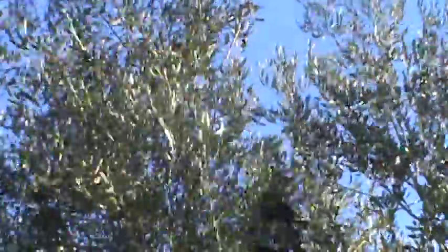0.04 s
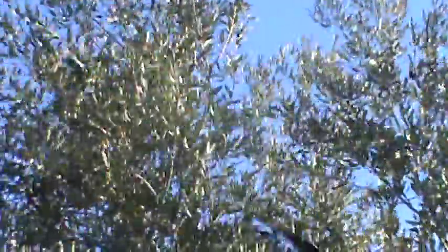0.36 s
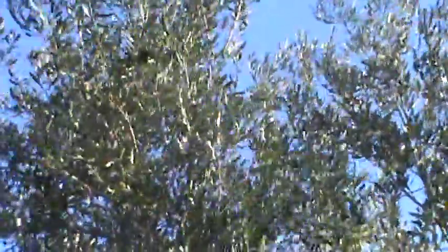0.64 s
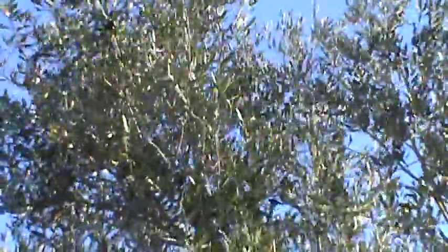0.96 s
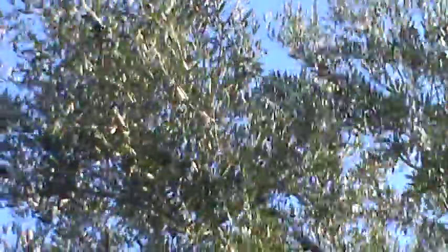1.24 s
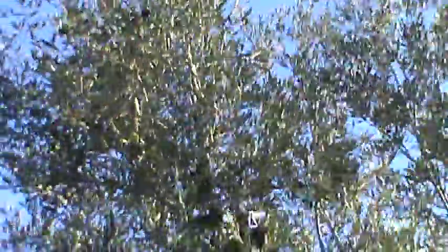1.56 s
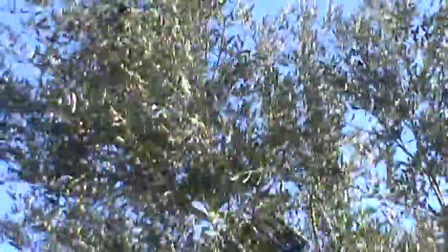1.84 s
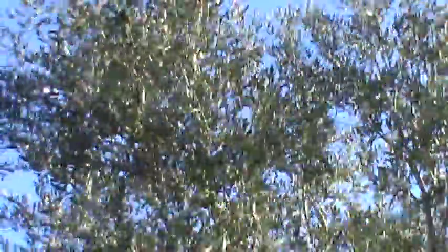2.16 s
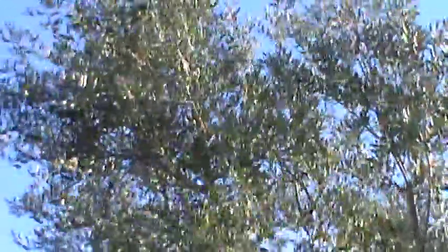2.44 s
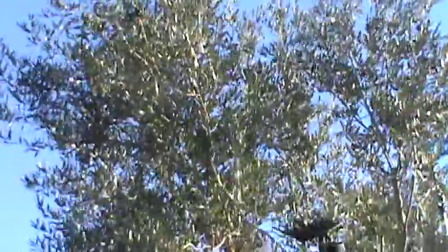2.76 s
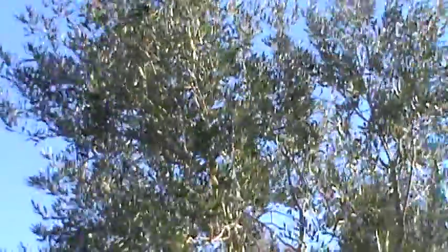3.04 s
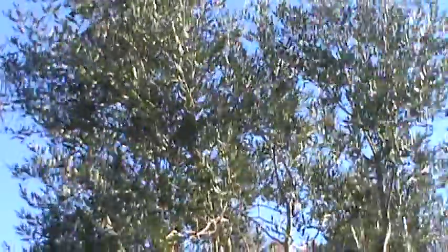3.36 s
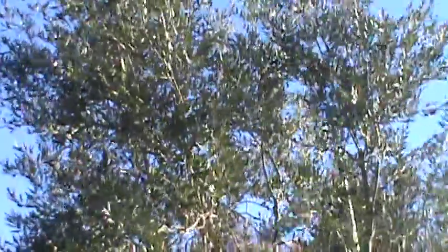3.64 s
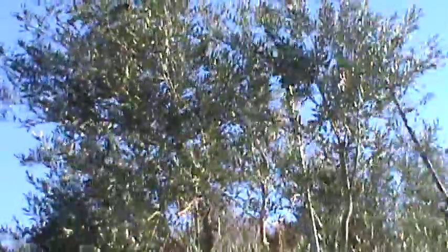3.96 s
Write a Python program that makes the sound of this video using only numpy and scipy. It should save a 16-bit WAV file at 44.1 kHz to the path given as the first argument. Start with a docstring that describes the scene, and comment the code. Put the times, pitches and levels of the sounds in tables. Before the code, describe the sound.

Air-driven rakes clatter rapidly in an olive tree for the whole four seconds, with thrashing twigs, rustling leaves, pinging tines and a bright air hiss. Engines thud further off, one chirping with each turn. From about 0.4 seconds, scattered hard blows hit branches; from 0.5 seconds the hiss tightens now and then into brief, high, fuzzy whistles. Four clear clinks stand out between 1 and 2.1 seconds.

```python
"""Air-driven rakes shake an olive tree outdoors. From the start, twigs thrash under a bright hiss of air,
boughs rustle, leaves sizzle and struck tines ring. Three engines thud further off, the nearest with a
chirp each turn; the combs clack twice per stroke. From 0.37 s hard blows land on branches, from 0.5 s
the hiss tightens into short fuzzy whistles, and between 1 and 2.1 s four clear clinks stand out.
Throughout, a fast gain control leans on the loudest moments."""
import sys
import numpy as np
from scipy import signal
from scipy.fft import rfft, irfft
from scipy.io import wavfile
from scipy.ndimage import uniform_filter1d

SR = 44100
rng = np.random.default_rng(int(sys.argv[2]) if len(sys.argv) > 2 else 0)


def dump(signal):
    """Clip the signal to [-1, 1] and save it as 16-bit WAV at the path in sys.argv[1]."""
    limited = np.clip(np.atleast_2d(signal).T, -1, 1)
    pcm = np.round(limited * 32767).astype(np.int16)
    wavfile.write(sys.argv[1], SR, pcm)


N = 176400
TIME = np.arange(N) / SR


def amp(db):
    """dB to gain."""
    return 10 ** (np.asarray(db) / 20)


def unit(x):
    """Scale to rms 1."""
    return x / np.sqrt(np.mean(x ** 2) + 1e-20)


def curve(table, column=1):
    """Time table column, interpolated per sample."""
    table = np.array(table)
    return np.interp(TIME, table[:, 0], table[:, column])


def at_hz(table, hz):
    """Frequency table, interpolated over log f."""
    f, value = np.transpose(table)
    return np.interp(np.log(hz + 1), np.log(f + 1), value)


def add(mix, start_s, sound):
    """Mix in place at start_s."""
    part = mix[max(round(start_s * SR), 0):][:len(sound)]
    part += sound[:len(part)]


def drift(cutoff_hz):
    """Low-passed noise, rms 1."""
    rolloff = 1 + (np.fft.rfftfreq(N, 1 / SR) / cutoff_hz) ** 4
    return unit(irfft(rfft(rng.standard_normal(N)) / rolloff, N))


def colour(x, spectrum, size=4096):
    """Minimum-phase filter of unit energy: spectrum levels are relative."""
    log_gain = np.log(amp(at_hz(spectrum, abs(np.fft.fftfreq(size, 1 / SR)))))
    response = np.exp(np.conj(signal.hilbert(log_gain)))
    taps = np.fft.ifft(response).real[:size // 2]
    return signal.oaconvolve(x, taps / np.linalg.norm(taps))[:N]


def resonate(x, hz, width_hz):
    """Resonator; hz may be a curve."""
    carrier = np.exp(2j * np.pi * np.cumsum(hz * np.ones(len(x))) / SR)
    pole = np.exp(-np.pi * width_hz / SR)
    return 2 * (carrier * signal.lfilter([1 - pole], [1, -pole], x / carrier)).real


def crossings_s(cycles):
    """Times at which a cycle count passes an integer."""
    return TIME[1:][np.diff(np.floor(cycles)) > 0]


# Left-right likeness: f/Hz, coherence
COHERENCE = [(250, 0.93), (550, 0.72), (1200, 0.63), (2500, 0.87), (5000, 0.71), (9000, 0.79),
             (14000, 0.91)]

def stereo(mid, side):
    """Mid/side to left/right, weighted by coherence."""
    coherence = np.clip(at_hz(COHERENCE, np.fft.rfftfreq(N, 1 / SR)), 0, 1)
    mid = irfft(rfft(mid) * np.sqrt((1 + coherence) / 2), N)
    side = irfft(rfft(side) * np.sqrt((1 - coherence) / 2), N)
    return np.array([mid + side, mid - side])


def shaped_noise(spectrum):
    """Stereo noise of a given spectrum."""
    return stereo(*(colour(noise, spectrum) for noise in rng.standard_normal((2, N))))


def band_noise(hz, width_hz):
    """Stereo noise through two resonators in series."""
    bands = [resonate(noise, hz, width_hz) for noise in rng.standard_normal((2, N))]
    return stereo(*(resonate(band, hz, width_hz) for band in bands))


def grove(x, echo_db=0.5, t60_s=0.035, count=6):
    """Stereo scatter from trunks, foliage and ground, shifting as the boughs swing."""
    t = TIME[:SR // 5]
    tails = rng.standard_normal((2, count, len(t))) * amp(-60 * t / t60_s) * (t > .002)
    shares = np.array([drift(7.2) for _ in range(count)])
    paths = x * shares / np.linalg.norm(shares, axis=0)
    mid, side = (signal.oaconvolve(paths, tail / np.linalg.norm(tail), axes=1).sum(0)[:N]
                 for tail in tails)
    return stereo(x + amp(echo_db) * mid, side)


# Struck twigs: f/Hz, level/dB
TWIG_SPECTRUM = [(60, -15.5), (250, -10), (500, -4.5), (750, -8), (1350, -4.5), (2100, 1.5), (2900, 1.5),
                 (3700, 0), (4400, -4), (6500, -3.5), (9000, -5), (16000, -42)]
# Shaken foliage: f/Hz, level/dB
WASH_SPECTRUM = [(20, -41), (45, -14), (110, -2), (250, -1.5), (550, -11), (800, -14.5), (1600, -6.5),
                 (2800, 2.5), (5000, -5.5), (9000, -6), (16000, -26)]
# Raking effort: t/s, thrash gain/dB, hiss level/dB
EFFORT = [(0, 1, -18), (.35, 1, -19), (.5, 2, -19), (.7, 1.5, -20), (.95, -1, -19.5), (1.2, -1, -18),
          (1.5, -2, -19), (1.72, 0, -18.5), (2.05, 0, -17.5), (2.3, 0.5, -19), (2.65, 0.5, -19),
          (3.1, 1.5, -18.5), (3.22, -0.5, -18), (3.3, 2, -19.5), (3.6, 2, -19.5), (3.68, 0, -19.5),
          (4, 2.5, -18)]

def twigs(taps_per_s=900, size_db=3, clump_db=2, tap_db=-30.5, wash_db=-31):
    """Twigs, leaves and olives tap the tines in clumps, over a wash of shaken foliage."""
    def taps():
        hits = (rng.random(N) < taps_per_s / SR) * rng.choice([-1, 1], N)
        sizes = amp(size_db * np.minimum(rng.exponential(1, N), 3))
        return unit(colour(hits * sizes, TWIG_SPECTRUM))
    wash = amp(wash_db) * shaped_noise(WASH_SPECTRUM)
    clumps = amp(tap_db + clump_db * drift(64)) * stereo(taps(), taps())
    return (clumps + wash) * amp(curve(EFFORT))


# Escaping air: f/Hz, level/dB
HISS_SPECTRUM = [(1500, -26.5), (4000, -27), (7000, -9.5), (8200, -3.5), (9400, 1.5), (10700, 4.5),
                 (12000, 2), (13300, -1), (14800, 0), (16000, -15.5)]

def hiss(flutter_db=1.16, band_drift_db=2.0, bands=6):
    """Escaping air: a bright hiss that flutters and shifts in colour."""
    spectrum = rfft(shaped_noise(HISS_SPECTRUM))
    band_index = np.interp(np.fft.rfftfreq(N, 1 / SR), [7500, 15500], [0, bands - 1])
    air = np.zeros((2, N))
    for k in range(bands):
        triangle = np.maximum(1 - abs(band_index - k), 0)
        air += irfft(spectrum * triangle, N) * amp(band_drift_db * drift(33))
    return unit(air * amp(flutter_db * drift(240))) * amp(curve(EFFORT, column=2))


# Bough rustle: f/Hz, level/dB
BOUGH_SPECTRUM = [(100, -10.5), (400, -4.5), (1150, -0.5), (1800, -8), (3500, -15), (9000, -54)]
# Rustle envelope: t/s, level/dB
BOUGH_LEVEL = [(0, -39.5), (.8, -46), (1.35, -42), (1.6, -39), (3.3, -39), (4, -43)]

def boughs(lumps_db=3.0):
    """Whole boughs swing with a dull rustle."""
    return shaped_noise(BOUGH_SPECTRUM) * amp(curve(BOUGH_LEVEL) + lumps_db * drift(67))


# Sizzle envelope: t/s, level/dB
LEAF_LEVEL = [(0, -33.5), (.17, -26.5), (.4, -35.5), (1.2, -30), (1.45, -35), (2.1, -34), (2.5, -38),
              (3.2, -51), (3.55, -31), (3.7, -42)]

def leaves(grain_db=4.0):
    """Dry leaves sizzle as a comb bites into a thick spray."""
    sizzle = band_noise(hz=4630, width_hz=2250) * amp(grain_db * drift(280))
    return unit(sizzle) * amp(curve(LEAF_LEVEL))


# Ping envelope: t/s, level/dB
PING_LEVEL = [(0, -37), (1.3, -35), (2, -33), (2.5, -34), (3.6, -36.5), (4, -32.5)]
# Single tine clinks: t/s, f/Hz, level/dB
CLINKS = [(.997, 4900, -22.5), (1.222, 4800, -22), (1.647, 5280, -22), (2.095, 4830, -23)]

def tines(pings_per_s=190, centre_hz=2982, spread_oct=0.303, spread_db=5.0,
          ping_t60_s=0.026, clink_t60_s=.07):
    """Struck tines ping around one pitch; a few clink higher and clearer."""
    out, t = np.zeros(N), TIME[:SR // 10]
    for when, pitch, size in rng.random((round(pings_per_s * N / SR), 3)):
        hz = centre_hz * 2 ** (spread_oct * (2 * pitch - 1))
        envelope = amp(spread_db * (2 * size - 1) - 60 * t / ping_t60_s)
        add(out, when * N / SR, envelope * np.sin(2 * np.pi * hz * t))
    out = unit(out) * amp(curve(PING_LEVEL))
    for start_s, hz, db in CLINKS:
        add(out, start_s, amp(db - 60 * t / clink_t60_s) * np.sin(2 * np.pi * hz * t))
    return grove(out)


# Engines, nearest first: firing rate/Hz, first firing t/s
FIRING = [(23.03, .0005), (25.15, .012), (24.62, .025)]
# Per engine: level/dB
ENGINE_DB = [-40.5, -44.5, -51]
# All engines: t/s, gain/dB
ENGINE_GAIN = [(.3, -.5), (1.1, -2), (2, .5), (4, 1)]
# Exhaust thuds: f/Hz, level/dB
NEAR_EXHAUST = [(30, -34), (46, -3), (69, -20), (92, 1), (160, 4), (205, 2), (245, 2.5), (290, -5.5),
                (325, -2.5), (380, -15.5), (570, -2.5), (760, -22), (3000, -38)]
FAR_EXHAUST = [(25, -34), (50, 10.5), (75, -20), (100, 1.5), (150, 8), (190, -4.5), (250, 4), (330, -11),
               (560, -3), (1500, -42)]

def engines(uneven=0.32):
    """Each firing sends a thud from an exhaust; three machines beat against each other."""
    out = np.zeros(N)
    for (hz, first_s), db, exhaust in zip(FIRING, ENGINE_DB, [NEAR_EXHAUST, FAR_EXHAUST, FAR_EXHAUST]):
        firings = np.zeros(N)
        for start_s in crossings_s((TIME - first_s) * hz):
            add(firings, start_s, np.array([1 + uneven * rng.normal()]))
        out += amp(db) * unit(colour(firings, exhaust))
    return grove(out * amp(curve(ENGINE_GAIN)), echo_db=-13)


def clack(decay_s=0.0022):
    """One sharp plastic knock: a noise burst of unit energy."""
    t = TIME[:SR // 60]
    knock = np.exp(-(t / decay_s) ** 2) * rng.choice([-1, 1], len(t))
    return knock / np.linalg.norm(knock)


def combs(times_s, jitter_s=.0004, spread_db=4):
    """Combs hit their stop at both ends of each stroke."""
    out = np.zeros(N)
    for start_s in times_s:
        add(out, start_s + jitter_s * rng.normal(), amp(spread_db * rng.uniform(-1, 1)) * clack())
    return unit(out)


# Near rake's pace: t/s, running clack count
CLACK_COUNT = [(0.0054, 0), (0.178, 6), (0.4627, 15), (0.9898, 33), (1.2141, 41), (1.3472, 46),
               (1.4047, 48), (1.5578, 53), (1.6228, 55), (1.8085, 62), (1.9754, 68), (2.0388, 70),
               (2.3535, 83), (2.5615, 90), (2.865, 101), (3.0565, 107), (3.5341, 124), (3.6681, 129),
               (3.9868, 140)]
# Near clack envelope: t/s, level/dB
CLACK_LEVEL = [(0, -35.5), (1.1, -31), (1.4, -28), (1.8, -32), (4, -30.5)]
# Near comb: f/Hz, level/dB
COMB_SPECTRUM = [(100, -23), (400, -19), (1000, -10), (1900, -3), (2900, -2.5), (4300, -6.5), (6500, 0.5),
                 (8500, 3.5), (12000, -4.5), (16000, -55)]
# Hardest blows of comb on branch: t/s, relative level/dB
BLOWS = [(0.369, 1.5), (0.7537, 0), (0.7827, -2), (0.8743, 0), (1.129, 0.5), (1.1852, 1.5), (1.7032, 4.5),
         (1.8076, 4.5), (2.1834, -1), (3.3363, 3), (3.4794, 0)]

def rakes(bounce_s=.0045, bounce_db=-34, far_stroke_hz=(16.2, 18.1, 15.8, 17.4), far_db=-32.5,
          wander=.04):
    """The near rake clacks, bounces and strikes branches; far rakes run at their own pace."""
    marks_s, count = np.transpose(CLACK_COUNT)
    times_s = np.interp(np.arange(count[-1] + 1), count, marks_s)
    near = amp(curve(CLACK_LEVEL)) * combs(times_s)
    knocks = amp(bounce_db) * combs(times_s + bounce_s)
    for start_s, db in BLOWS:
        add(knocks, start_s, amp(db) * clack())
    far = np.zeros(N)
    for hz in far_stroke_hz:
        strokes = np.cumsum(hz * (1 + wander * drift(2))) / SR
        far += combs(crossings_s(2 * strokes + rng.random()))
    dull = (amp(far_db) * unit(far) + knocks) * amp(curve(EFFORT))
    return grove(colour(near, COMB_SPECTRUM), echo_db=-9) + grove(colour(dull, TWIG_SPECTRUM))


def engine_chirp(hz=1487, waver_hz=30, rough=0.54, lead_s=.0115, rise_s=0.0056, level_db=-39):
    """A metallic chirp once per turn of the nearest engine, just before it fires."""
    firing_hz, first_s = FIRING[0]
    age_s = ((TIME - first_s + lead_s) * firing_hz % 1) / firing_hz
    tone = np.sin(2 * np.pi * (hz + waver_hz * drift(22)) * age_s)
    rasp = rough * unit(resonate(rng.standard_normal(N), hz, width_hz=410))
    envelope = (age_s / rise_s) ** 2 * np.exp(-2 * age_s / rise_s)
    return grove(amp(level_db) * unit((tone + rasp) * envelope), echo_db=-4.5)


# Air whistles: t/s, length/s, f/Hz, relative level/dB
WHISTLES = [(0.495, 0.033, 9800, -17.5), (0.557, 0.022, 10500, -14.5), (0.609, 0.047, 10500, -13.5),
            (0.73, 0.049, 10300, -17.5), (0.78, 0.03, 10700, -14.5), (0.903, 0.027, 10300, -15),
            (0.937, 0.041, 11500, -18), (1.028, 0.024, 10800, -13), (1.076, 0.029, 11500, -17),
            (1.135, 0.053, 10700, -18), (1.35, 0.023, 12000, -16), (1.41, 0.03, 11800, -16.5),
            (1.847, 0.027, 11300, -15.5), (2.352, 0.04, 11000, -15), (3.178, 0.023, 11300, -18),
            (3.234, 0.021, 10900, -16), (3.668, 0.029, 10600, -18), (3.723, 0.043, 9900, -18.5),
            (3.848, 0.03, 10800, -18)]

def whistles(edge_s=0.0059, waver=0.019, gain_db=1.0, ragged_db=1.5):
    """The hiss tightens into fuzzy, ragged whistles of 20-50 ms."""
    envelope, pitches = np.zeros(N), []
    for start_s, length_s, hz, db in WHISTLES:
        inside_s = np.minimum(TIME - start_s, start_s + length_s - TIME)
        envelope += amp(db) * np.clip(inside_s / edge_s + .5, 0, 1)
        pitches.append((start_s + length_s / 2, hz))
    pitch_hz = curve(pitches) * (1 + waver * drift(200))
    tone = band_noise(pitch_hz, width_hz=1400) * amp(ragged_db * drift(230))
    return amp(gain_db) * envelope * unit(tone)


def scene(right_bias_db=0.75):
    """Stereo sum of all sources."""
    mix = (twigs() + hiss() + boughs() + leaves() + tines()
           + engines() + rakes() + engine_chirp() + whistles())
    return mix * amp([[-right_bias_db / 2], [right_bias_db / 2]])


def record(dry, threshold_db=-17, cut_db_per_db=0.62, window_s=0.0073, cutoff_hz=16100):
    """Fast gain control, then a low-pass."""
    power = uniform_filter1d((dry ** 2).mean(0), int(window_s * SR))
    over_db = np.maximum(10 * np.log10(abs(power) + 1e-12) - threshold_db, 0)
    low_pass = signal.firwin(511, cutoff_hz, window=("kaiser", 9), fs=SR)
    return signal.oaconvolve(dry * amp(-cut_db_per_db * over_db), low_pass[None], "same")


dry = scene()
out = record(dry)
dump(out)
```